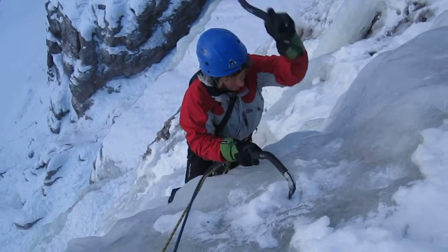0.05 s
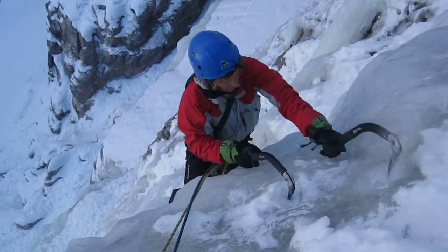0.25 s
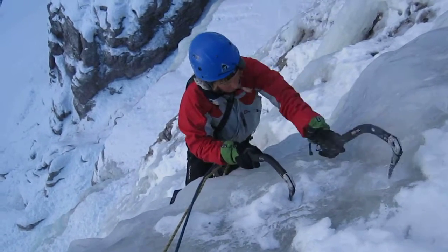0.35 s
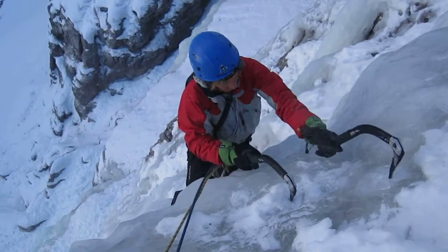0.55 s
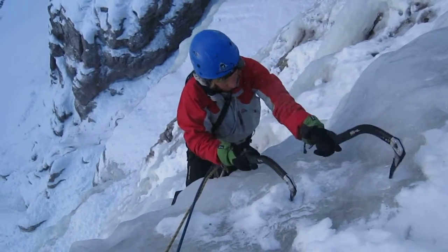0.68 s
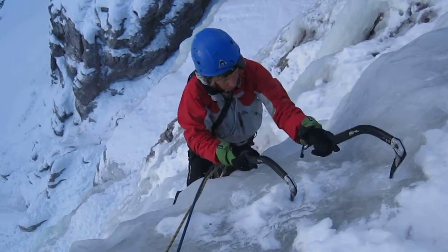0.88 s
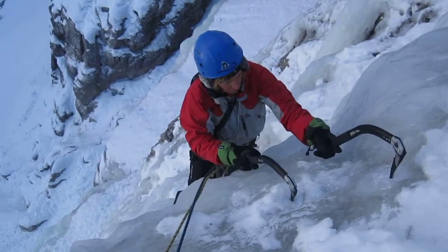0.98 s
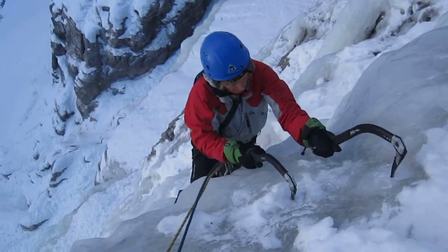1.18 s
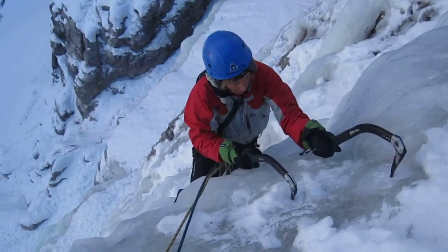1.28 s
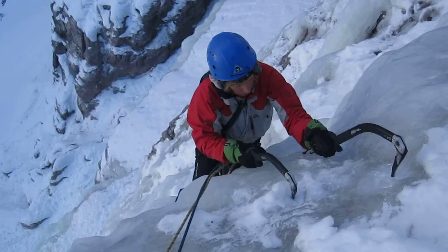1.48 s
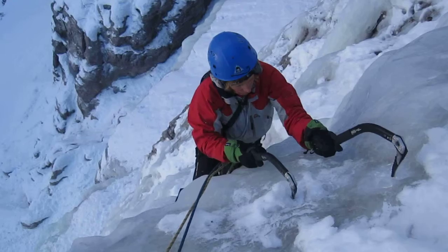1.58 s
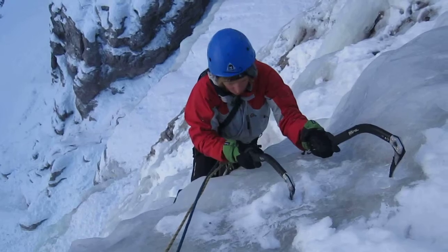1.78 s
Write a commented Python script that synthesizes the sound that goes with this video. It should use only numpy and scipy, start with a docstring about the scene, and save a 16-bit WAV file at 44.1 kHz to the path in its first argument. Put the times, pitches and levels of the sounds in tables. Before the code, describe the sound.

An ice axe strikes ice once, close by, at about 0.25 seconds: a sharp crunch with a brief steel ring and low thump. Small cracks and trickling crumbs follow, thickest around 1 second, where stiff clothing rustles and gear bumps softly. A few light clinks come between 1.3 and 1.7 seconds. Light wind and a very faint whine lie beneath throughout.

```python
"""On a frozen slope, close to a camera, a climber drives in an ice axe with one hard blow.
The impact crushes ice and excites the modes of the steel, which ring briefly. The ice cracks and
sheds crumbs; stiff clothing rustles by friction and gear bumps and clinks as the weight shifts.
Light wind and a faint whine lie beneath. The blow overloads the microphone with a low thump,
and the camera's gain ducks."""
import sys
import numpy as np
from scipy import signal
from scipy.fft import rfft, irfft, next_fast_len
from scipy.io import wavfile
from scipy.ndimage import uniform_filter1d, minimum_filter1d, map_coordinates

SR = 44100
rng = np.random.default_rng(int(sys.argv[2]) if len(sys.argv) > 2 else 0)


def persist_wave(psi):
    """Save psi, clipped to +-1, as 16-bit WAV."""
    counts = np.round(np.clip(psi, -1, 1) * 32767).astype(np.int16)
    wavfile.write(sys.argv[1], SR, np.atleast_2d(counts).T)


N = 81585

# Spectrum of light wind (frequency [Hz], relative density [dB])
WIND_SPECTRUM = [(25, -0.5), (70, -3), (200, -3.5), (500, -1), (1300, -2.5), (1600, -5), (1900, 0.5),
                 (2500, -1.5), (3300, -1), (4800, -18.5), (7500, -25), (10500, -30), (13000, -32),
                 (16000, -3)]
# Partials of the whine (frequency [Hz], level [dB])
WHINE_PARTIALS = [(1863, -64), (1894, -60.5), (2180, -62.5), (3262, -69.5)]
# Envelope of rubbing cloth (time [s], level [dB])
CLOTH_ENVELOPE = [(0, -44.5), (.06, -45), (.11, -43), (.21, -39), (.25, -41), (.33, -47), (.41, -44.5),
                  (.5, -45), (.62, -44.5), (.72, -43), (.8, -46), (.93, -37.5), (1.02, -39), (1.13, -45.5),
                  (1.25, -42.5), (1.44, -47.5), (1.485, -44.5), (1.515, -41.5), (1.56, -49.5), (1.68, -54),
                  (1.72, -47), (1.85, -49.5)]
# Spectrum of rubbing cloth (frequency [Hz], relative density [dB])
CLOTH_SPECTRUM = [(60, -20.5), (250, -14), (700, -2), (1400, 1), (2400, -2), (3500, 3.5), (5000, 1),
                  (7500, 0), (10500, -2), (12500, -10.5), (16000, -7)]
# Envelope of trickling crumbs (time [s], level [dB])
CRUMB_ENVELOPE = [(0, -80), (.2, -58), (0.328, -37.5), (.45, -50), (.65, -49.5), (.8, -44.5), (1.0, -42),
                  (1.12, -43), (1.22, -45.5), (1.35, -48.5), (1.65, -54), (1.85, -50)]
# Spectrum of the crumbs (frequency [Hz], relative density [dB])
CRUMB_SPECTRUM = [(200, -22), (1500, -18), (4000, 4), (7000, -5), (10500, 2.5), (12500, -11.5),
                  (16000, -44)]
# Boots and gear against the slope (time [s], energy [dB], centre [Hz], T60 [s])
GEAR_BUMPS = [(0.3773, -15, 290, .045), (.377, -14.5, 1410, 0.014), (.448, -27.5, 232, .14),
              (.545, -32.5, 60, 0.12), (.683, -19, 1120, 0.027), (.9885, -8, 694, 0.0226),
              (1.0105, -13, 560, 0.041), (1.012, -5.5, 3450, 0.029), (1.07, -22.5, 260, 0.092),
              (1.286, -22.5, 208, 0.049), (1.287, -20.5, 700, 0.014)]
# Clinks of gear and ice chips (time [s], energy [dB], centre [Hz], half width [octaves], T60 [s])
GEAR_CLINKS = [(.311, -23, 4660, 0.095, 0.048), (.312, -26, 11500, .02, 0.087),
               (1.339, -21, 7500, .01, .18), (1.501, -13, 9900, 0.091, 0.2),
               (1.513, -12, 6300, 0.063, 0.08), (1.703, -11.5, 10300, 0.016, 0.052)]
# Ice cracking and crumbs landing; cracks() scales the base values
# (time [s], base energy [dB], centre [Hz], base half width [octaves], base T60 [s])
ICE_CRACKS = [(0.0143, -4, 6500, 0.54, 0.0015), (0.0844, -12, 4900, 0.69, 0.0021),
              (0.1506, -9, 6600, 0.65, 0.0018), (0.1976, -7, 5300, 0.71, 0.0028),
              (0.2148, -9, 4600, 0.71, 0.0035), (0.218, -12, 6100, 0.64, 0.0025),
              (0.2568, -4, 4400, 0.55, 0.0024), (0.3414, -11, 5200, 0.59, 0.0014),
              (0.38, -9, 3300, 1.02, 0.0026), (0.3908, -12, 5500, 0.83, 0.0026),
              (0.3975, -11, 4700, 0.9, 0.0029), (0.4198, -11, 5300, 0.73, 0.0029),
              (0.4964, -14, 3400, 0.43, 0.002), (0.5554, -11, 7200, 0.66, 0.0015),
              (0.6008, -8, 5600, 0.63, 0.0025), (0.6543, -10, 7400, 0.46, 0.0022),
              (0.6931, -15, 7900, 0.68, 0.0015), (0.7, -5, 8400, 0.26, 0.0019),
              (0.7034, -4, 7800, 0.53, 0.003), (0.7054, -10, 8600, 0.51, 0.0044),
              (0.7118, -11, 4400, 0.71, 0.0022), (0.7382, -14, 4300, 0.74, 0.0028),
              (0.7559, -14, 6100, 0.63, 0.0014), (0.7728, -14, 3600, 0.6, 0.0024),
              (0.8157, -13, 4000, 0.62, 0.0015), (0.8317, -15, 4700, 0.72, 0.0016),
              (0.8353, -13, 2200, 1.05, 0.0024), (0.8453, -8, 4400, 0.79, 0.0019),
              (0.8525, -14, 5100, 0.61, 0.0022), (0.8937, -5, 9000, 0.38, 0.0013),
              (0.899, -3, 6400, 0.55, 0.0014), (0.9253, -10, 4100, 0.82, 0.0036),
              (0.9368, -8, 3500, 0.82, 0.0021), (0.9846, -7, 4100, 0.69, 0.0044),
              (0.9895, -3, 1400, 1.01, 0.003), (0.9943, -11, 5000, 0.85, 0.002),
              (0.998, 1, 7600, 0.44, 0.0017), (1.0008, 3, 8900, 0.3, 0.0021),
              (1.0032, 0, 9200, 0.28, 0.0018), (1.0113, 0, 4000, 0.78, 0.005),
              (1.0716, -9, 4600, 0.8, 0.003), (1.0826, -14, 3000, 0.79, 0.0022),
              (1.1071, -14, 5300, 0.7, 0.0024), (1.1236, -10, 4300, 0.55, 0.0018),
              (1.1372, -15, 6700, 0.7, 0.0018), (1.1608, -2, 9300, 0.4, 0.0012),
              (1.282, -8, 9200, 0.41, 0.0019), (1.2868, -5, 5800, 0.78, 0.0028),
              (1.3604, -6, 3500, 0.71, 0.0014), (1.4805, -15, 3500, 1.12, 0.0018),
              (1.5008, -12, 9300, 0.33, 0.0036), (1.5052, -10, 3200, 0.52, 0.002),
              (1.5139, -12, 4800, 0.68, 0.0041), (1.549, -14, 8300, 0.52, 0.0022),
              (1.7024, -8, 6800, 0.58, 0.0041)]
# Filter common to all cracks (frequency [Hz], relative gain [dB])
CRACK_RESPONSE = [(200, -1), (1500, 5), (5000, 1), (10500, 3.5), (13000, 3), (16000, 1)]
# Spectrum of ice being crushed (frequency [Hz], relative density [dB])
CRUSH_SPECTRUM = [(100, -14), (250, -14), (600, -11), (1250, -0.5), (1550, -12), (1900, 2), (3000, -6),
                  (5000, 6.5), (7800, -3.5), (9500, 3.5), (12000, -12), (16000, -26)]
# Spectrum of chips flying from the hole (frequency [Hz], relative density [dB])
CHIP_SPECTRUM = [(200, 1), (1500, -4), (3500, 0.5), (9500, -5), (13000, -17), (16000, -20)]
# Normal modes of the axe (frequency [Hz], level [dB], T60 [s])
AXE_MODES = [(747, -28, 0.048), (1190, -31, 0.076), (1844, -8.5, 0.021), (2590, -35, 0.036),
             (2866, -18.5, 0.039), (3242, -7, 0.026), (3900, -49, 0.038), (4516, -4.5, 0.015),
             (5200, -47, 0.055), (5440, -46, 0.031), (6570, -1.5, 0.019), (7270, -27, 0.046),
             (9160, -21.5, 0.076), (9370, -44, 0.032)]
# Response of the microphone (frequency [Hz], gain [dB])
MIC_RESPONSE = [(20, 1), (10000, 0), (13000, 2), (16000, -11.5)]


def amp(db):
    """Amplitude ratio of a level in decibels."""
    return 10 ** (np.asarray(db) / 20)


def unit(x):
    """Normalisation to an rms of 1."""
    return x / np.sqrt(np.mean(x ** 2) + 1e-20)


def energy(x, db):
    """Normalisation of a transient to an energy in dB."""
    return amp(db) * x / np.linalg.norm(x)


def fade(t, t60):
    """Exponential decay from t = 0, by 60 dB in t60 seconds."""
    return amp(-60 * np.maximum(t, 0) / t60)


def add(track, start_s, sound):
    """Superposition of a sound on the track."""
    part = track[max(round(start_s * SR), 0):][:len(sound)]
    part += sound[:len(part)]


def colour(x, points):
    """Minimum-phase filter through (frequency [Hz], gain [dB]) points."""
    size = 2 * next_fast_len(len(x))
    hz, db = np.transpose(points)
    gain_db = np.interp(np.log(np.fft.rfftfreq(size, 1 / SR) + 1), np.log(hz), db)
    cepstrum = irfft(np.log(amp(gain_db)))
    cepstrum[1:size // 2] *= 2  # folding makes the filter causal
    cepstrum[size // 2 + 1:] = 0
    return irfft(rfft(x, size) * np.exp(rfft(cepstrum)))[:len(x)]


def band(x, hz, octaves):
    """Second-order resonance reaching the given octaves either side of hz."""
    edges = np.minimum([hz / 2 ** octaves, hz * 2 ** octaves], [15000, 19000])
    return signal.sosfilt(signal.butter(1, edges, "bandpass", fs=SR, output="sos"), x)


def wobble(per_s):
    """Smooth random modulation: a spline through per_s knots a second."""
    knots = rng.standard_normal(int(N * per_s / SR) + 4)
    return map_coordinates(knots, [np.arange(N) * per_s / SR])


def patchy(depth_db):
    """White noise modulated in random patches of time and frequency."""
    spectra = signal.stft(rng.standard_normal(N), nperseg=256)[2]
    patches = uniform_filter1d(rng.standard_normal(spectra.shape), size=12, axis=0)
    patches = uniform_filter1d(patches, size=5, axis=1)
    return signal.istft(spectra * amp(depth_db * unit(patches)), nperseg=256)[1][:N]


def burst(envelope, passes=8):
    """Noise transient, brought by alternating projection to a nearly flat spectrum."""
    x = envelope * rng.standard_normal(len(envelope))
    for _ in range(passes):
        flat = irfft(np.exp(1j * np.angle(rfft(x))), len(x))
        x = envelope * np.sqrt(2) * np.cos(np.angle(signal.hilbert(flat)))
    return x


def wind():
    """Turbulence in light wind gives nearly steady broadband noise."""
    level_db = -52 + 0.2 * wobble(per_s=3.3)
    return amp(level_db) * unit(colour(patchy(depth_db=1.6), WIND_SPECTRUM))


def whine():
    """Slight amplitude and phase modulation makes a few faint pure tones waver."""
    out, t = np.zeros(N), np.arange(N) / SR
    for hz, db in WHINE_PARTIALS:
        peak = np.sqrt(2) * amp(db + 0.73 * wobble(per_s=7.5))
        out += peak * np.sin(2 * np.pi * hz * t + .7 * wobble(per_s=11))
    return out


def rustle():
    """Friction of stiff cloth gives fluttering noise that follows the climber's movement."""
    level_db = np.interp(np.arange(N) / SR, *np.transpose(CLOTH_ENVELOPE)) + wobble(per_s=70)
    return amp(level_db) * unit(colour(patchy(depth_db=1.5), CLOTH_SPECTRUM))


def crumbs(grains_per_s=1100):
    """Shot noise: tiny grains of ice strike the slope at random as they trickle down."""
    level_db = np.interp(np.arange(N) / SR, *np.transpose(CRUMB_ENVELOPE))
    strength_db = 6 * np.minimum(rng.exponential(size=N), 3)
    hits = (rng.random(N) < grains_per_s / SR) * amp(strength_db)
    decay = fade(np.arange(SR // 100) / SR, t60=.00085)
    grains = signal.fftconvolve(hits, decay)[:N] * rng.standard_normal(N)
    return amp(level_db) * unit(colour(grains, CRUMB_SPECTRUM))


def bumps(attack_s=.004, octaves=.78):
    """Soft impacts of boots and gear on the slope excite broad, heavily damped resonances."""
    out, t = np.zeros(N), np.arange(SR // 5) / SR
    for start_s, db, hz, t60 in GEAR_BUMPS:
        push = burst(fade(t, t60) * (1 - fade(t, attack_s)), passes=4)
        add(out, start_s, energy(band(band(push, hz, octaves), hz, octaves), db))
    return out


def clinks():
    """Narrow resonances give the decaying noise of struck gear and ice chips a rough pitch."""
    out, t = np.zeros(N), np.arange(SR // 5) / SR
    for start_s, db, hz, octaves, t60 in GEAR_CLINKS:
        strike = fade(t, t60) * rng.standard_normal(len(t))
        add(out, start_s, energy(band(strike, hz, octaves), db))
    return out


def cracks(stretch=1.7, widen=1.19, trim_db=-.5):
    """Brittle fracture: each crack is a tiny burst with its own pitch, then a faint crumbling."""
    out, t = np.zeros(N), np.arange(SR // 25) / SR
    crumbling = amp(-19) * fade(t, t60=.014)
    for start_s, db, hz, octaves, t60 in ICE_CRACKS:
        snap = burst(fade(t, stretch * t60) + crumbling)
        width = widen * octaves
        pitched = band(band(snap, hz, width), hz, width)
        add(out, start_s, energy(colour(pitched, CRACK_RESPONSE), db + trim_db))
    return out


def axe_blow(start_s=.2432, attack_s=.00024, hold_s=.0034, overload_s=.0012, pick_hz=6610):
    """Impact excitation: the pick crushes ice, throws chips and sets the steel's modes ringing."""
    out, t = np.zeros(N), np.arange(SR) / SR
    rise = 1 - np.exp(-t / attack_s)
    crush_envelope = rise * fade(t - hold_s, t60=.0081)
    crush = colour(burst(crush_envelope[:SR // 20]), CRUSH_SPECTRUM)
    chips = amp(-25) * fade(t, t60=.12) * unit(colour(rng.standard_normal(SR), CHIP_SPECTRUM))
    steel = sum(amp(db) * fade(t, t60) * np.sin(2 * np.pi * (hz * t + rng.random()))
                for hz, db, t60 in AXE_MODES)
    note_db = -42.5 + 2.5 * wobble(per_s=32)[:len(t)]  # one note of the pick lingers, unevenly
    note = amp(note_db) * fade(t, t60=.85) * np.sin(2 * np.pi * pick_hz * t)
    # a one-sided pulse stands for the low thump as the blow overloads the microphone
    overload_thump = -amp(-13.5) * t / overload_s * np.exp(1 - t / overload_s)
    add(out, start_s, energy(crush, db=19.5))
    add(out, start_s, rise * (chips + steel + note) + overload_thump)
    return out


def duck(x, threshold_db=-19, share=.61, hold_s=.071, release_db_per_s=123, attack_s=.012):
    """Automatic gain control: the gain falls by a share of the excess level, holds and recovers."""
    power = signal.lfilter(np.ones(256) / 256, 1, x ** 2)
    cut_db = share * np.maximum(10 * np.log10(power + 1e-12) - threshold_db, 0)
    half_hold = int(hold_s * SR / 2)
    held_db = -minimum_filter1d(-cut_db, 2 * half_hold + 1, origin=half_hold, mode="constant")
    ramp_db = release_db_per_s * np.arange(N) / SR
    released_db = np.maximum.accumulate(held_db + ramp_db) - ramp_db
    pole = np.exp(-1 / (attack_s * SR))
    return x * amp(-signal.lfilter([1 - pole], [1, -pole], released_db))


def scene():
    """Superposition: the pressures of all sources add at one microphone."""
    return (axe_blow() + cracks() + bumps() + clinks() + rustle() + crumbs() + wind() + whine())[None]


def record(dry):
    """Saturation and compression: the microphone overloads, the gain ducks and the top treble is cut."""
    ceiling, low_cut_hz, top_hz = .66, 10, 16200
    saturated = dry[0] / (1 + np.abs(dry[0] / ceiling) ** 4) ** (1 / 4)
    low_cut = signal.butter(1, low_cut_hz, "highpass", fs=SR, output="sos")
    ducked = duck(signal.sosfilt(low_cut, colour(saturated, MIC_RESPONSE)))
    size = next_fast_len(N + SR // 2)
    low_pass = 1 / (1 + (np.fft.rfftfreq(size, 1 / SR) / top_hz) ** 120)
    return irfft(rfft(ducked, size) * low_pass, size)[None, :N]


dry = scene()
out = record(dry)
persist_wave(out)
```